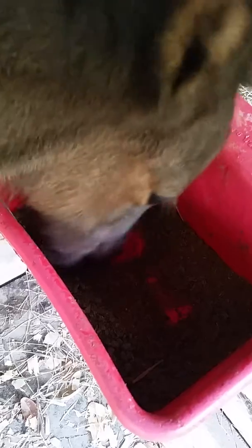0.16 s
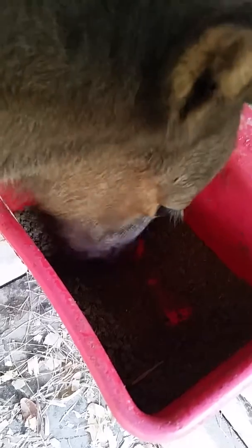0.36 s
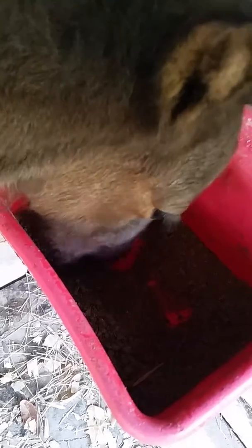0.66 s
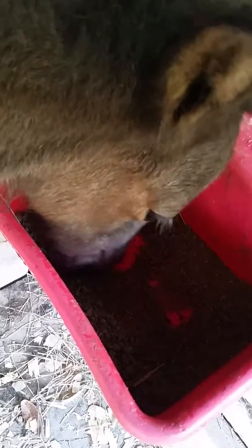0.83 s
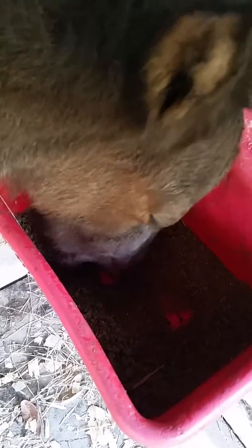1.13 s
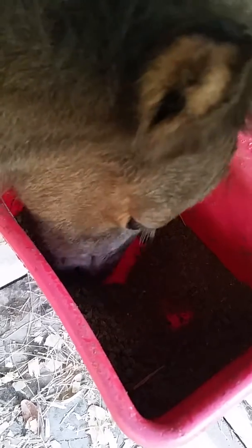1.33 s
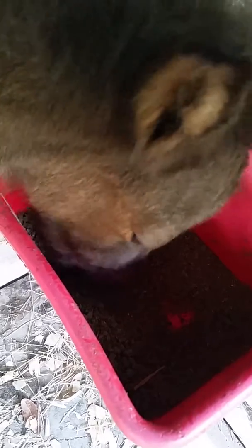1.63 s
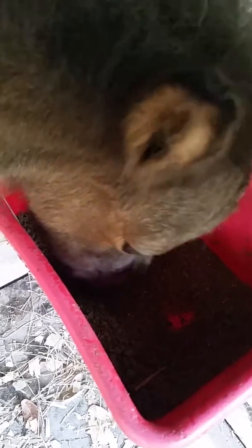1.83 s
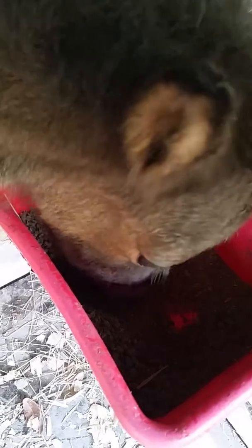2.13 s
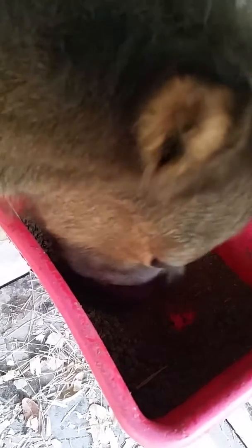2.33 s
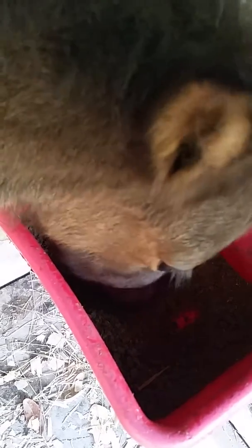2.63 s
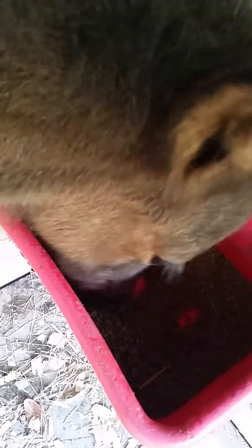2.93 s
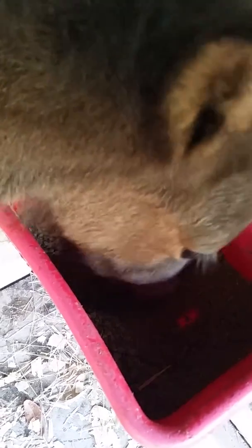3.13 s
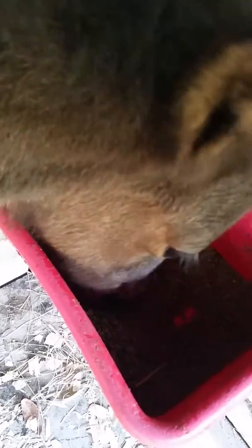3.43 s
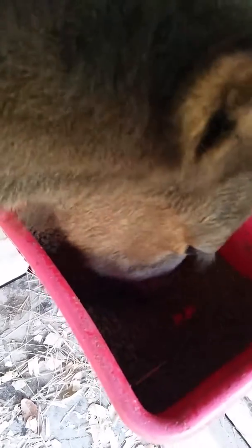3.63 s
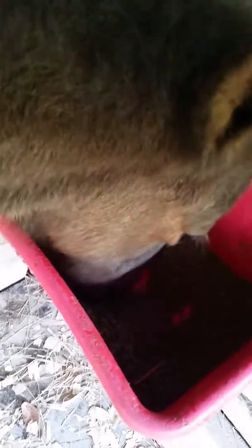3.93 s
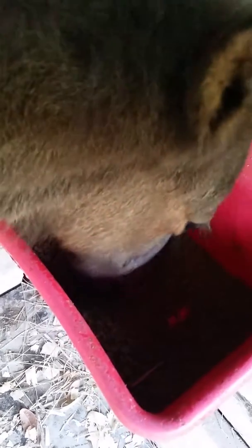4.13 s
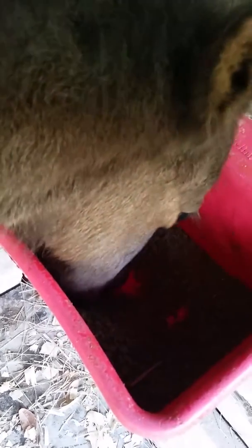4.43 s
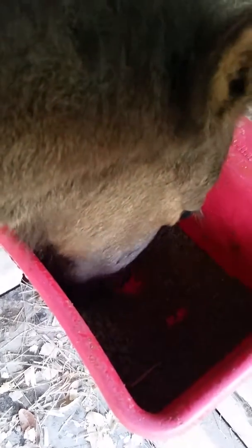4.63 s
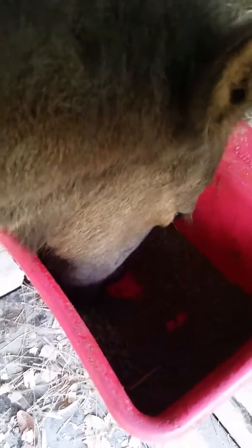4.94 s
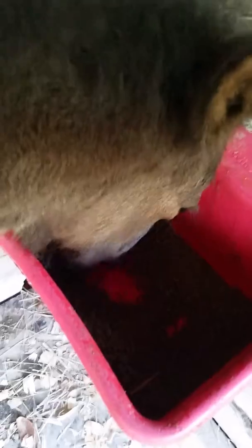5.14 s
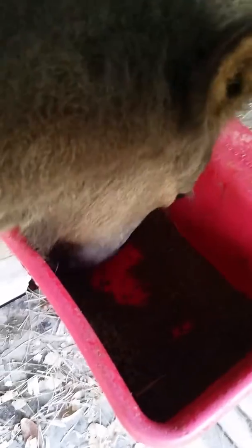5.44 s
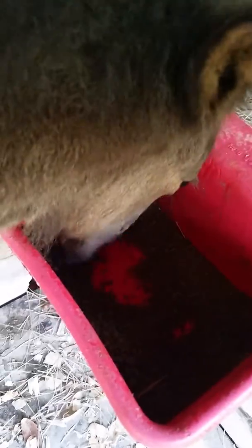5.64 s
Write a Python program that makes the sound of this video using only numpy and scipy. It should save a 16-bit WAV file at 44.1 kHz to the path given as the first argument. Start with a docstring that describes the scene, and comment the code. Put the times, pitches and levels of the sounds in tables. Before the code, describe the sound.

A close stereo microphone by a plastic feed tub catches a young horse eating. First come quiet dull crunches and tiny wet clicks, then fine, crisp swishes of dry meal with snapping grains, scraping and low thumps on the tub. Chewing continues throughout over soft outdoor rumble, slight hiss and distant gliding birds, and a strong short thud lands just before the end.

```python
"""A foal chews crushed feed with its muzzle in a plastic tub, heard close by in quiet outdoor air.
From the start, muffled crunches (random fractures through resonators) come in strokes about two a second,
under faint gliding whistles of far birds. From about 2 s the muzzle pushes into dry meal (pinging grains)
and bumps the tub (decaying wall modes); the wall then rumbles (shaped noise) to the end. The whistles are
clearest from 3 to 4 s; the hardest bump comes last."""
import sys
import numpy as np
from scipy import signal
from scipy.fft import rfft, irfft, next_fast_len
from scipy.io import wavfile

SR = 44100
rng = np.random.default_rng(int(sys.argv[2]) if len(sys.argv) > 2 else 0)


def output_pcm(signal):
    """Save a mono or channel-first signal as 16-bit PCM at the path in sys.argv[1].

    Samples are clipped to [-1, 1] before scaling.
    """
    pcm = np.clip(np.atleast_2d(signal).T, -1, 1) * 32767
    wavfile.write(sys.argv[1], SR, np.round(pcm).astype(np.int16))


N = 254891
TIME = np.arange(N) / SR
CUTOFF_HZ = 15850

# loudest feed breaking between the teeth:
# (time [s], level [dB], length [s], ring [Hz], crispness re ring [dB])
CRUNCHES = [(0.002, -59, 0.012, 842, -17), (0.287, -59, 0.0075, 454, -26), (0.325, -60, 0.0053, 480, -28),
            (0.356, -49.5, 0.023, 452, -23.5), (0.389, -43.5, 0.0015, 586, -2.5),
            (0.403, -51.5, 0.0042, 490, -7), (0.427, -48.5, .005, 520, -24),
            (0.439, -50.5, 0.0035, 800, -25), (0.468, -47.5, 0.0018, 565, -15),
            (0.491, -48, 0.0032, 477, -8.5), (0.509, -45, 0.0039, 452, -21.5),
            (0.527, -48, 0.003, 480, -9.5), (0.604, -48.5, 0.015, 499, -25),
            (0.634, -55.5, 0.0078, 443, -27), (0.758, -62.5, 0.014, 474, -11.5),
            (0.786, -58, 0.0043, 530, -9), (0.925, -59, 0.02, 455, -24), (0.996, -48, 0.0047, 514, -27),
            (1.009, -50.5, 0.0045, 546, -13), (1.053, -56.5, 0.0094, 450, -25),
            (1.147, -64, 0.0036, 460, -30), (1.179, -60, 0.0096, 477, -31),
            (1.414, -58.5, 0.0068, 526, -26), (1.472, -57, 0.0036, 480, -26),
            (1.499, -53, 0.0032, 546, -17), (1.51, -49.5, 0.0089, 532, -18), (1.535, -51, 0.0045, 507, -16),
            (1.583, -60, 0.0072, 540, -24), (1.645, -60.5, 0.011, 470, -26),
            (1.776, -52.5, 0.019, 528, -20), (1.886, -51.5, 0.0042, 495, -24),
            (1.898, -44, 0.0075, 557, -7), (2.006, -56.5, 0.0025, 580, -8), (2.376, -55.5, 0.011, 488, -6),
            (2.66, -49.5, 0.0038, 398, -13), (3.013, -53.5, 0.01, 474, -2.5), (3.039, -49, 0.007, 493, -15),
            (3.049, -44.5, 0.0042, 715, -19), (3.084, -44, 0.0026, 530, -20),
            (3.452, -53, 0.0038, 474, -22), (3.533, -53.5, 0.013, 450, -22), (3.575, -54.5, 0.022, 475, -9),
            (3.644, -50.5, 0.0023, 566, -9), (3.667, -43, 0.0049, 485, -18),
            (3.764, -54.5, 0.035, 413, -12), (3.915, -47.5, 0.013, 420, -26),
            (4.153, -56, 0.0082, 510, -21.5), (4.172, -51, 0.0034, 556, -10), (4.184, -56, 0.017, 500, -6),
            (4.276, -47.5, 0.002, 580, -12), (4.281, -56.5, 0.006, 590, 0), (4.33, -54, 0.011, 437, -10.5),
            (4.498, -60, 0.0063, 490, -15), (4.551, -55, 0.011, 465, -12), (4.597, -55.5, 0.01, 484, -9),
            (4.622, -55, 0.0052, 500, -8), (4.651, -54, 0.0065, 471, -5), (4.665, -56, 0.0083, 473, -4),
            (4.679, -46, 0.0059, 497, -25), (4.69, -43.5, 0.0021, 460, -11), (4.703, -56.5, 0.017, 467, -6),
            (4.789, -59, 0.0041, 393, -4), (4.919, -48.5, 0.0041, 486, -26),
            (4.936, -48.5, 0.0056, 414, -34), (4.957, -48, 0.0016, 477, -32),
            (4.992, -49, 0.0036, 530, -13.5), (5.001, -51, 0.0056, 460, -11),
            (5.097, -52, 0.0089, 590, -6.5), (5.111, -55, 0.005, 567, 1), (5.123, -41, 0.0049, 532, -7.5),
            (5.168, -36.5, 0.0023, 910, -35), (5.407, -53, 0.0053, 465, -30),
            (5.459, -50.5, 0.0076, 477, -18), (5.537, -47.5, 0.0033, 904, -2),
            (5.567, -48.5, 0.0077, 938, -3), (5.586, -54, 0.0031, 910, -16), (5.589, -48, 0.0019, 980, -11),
            (5.604, -57, 0.0029, 910, -4), (5.689, -48, 0.003, 560, -18)]
# hollow of mouth and tub before pitch shift, main ring first: (frequency [Hz], width [Hz], gain [dB])
HOLLOW = [(471.2, 36, 8.5), (541, 18, -5), (741, 71, -8)]
# hard sound of the break, before random scatter: (frequency [Hz], width [Hz], gain [dB])
CRISP = [(800, 16, 23.5), (970, 16, 11), (1231, 88, 1), (1600, 28, 9), (2120, 81, -6), (3340, 1400, 5)]
# wet films parting at lips and teeth: (time [s], peak [dB], pitch [Hz])
SMACKS = [(0.372, -62, 1920), (0.3885, -52, 3700), (0.39, -53, 2150), (0.482, -63.5, 3500),
          (0.597, -65, 3600), (0.4668, -65, 1310), (0.4938, -66, 1690), (0.5134, -65, 1600),
          (0.5627, -57, 1660), (0.617, -62, 3220), (1.008, -66, 1940), (1.436, -67, 1410),
          (1.505, -69, 1520), (1.535, -76, 1910), (1.884, -64, 3600), (1.9018, -55, 2460),
          (1.904, -59, 3300), (3.0497, -60, 1400), (3.084, -56, 1300), (3.17, -49.5, 1600),
          (3.647, -59, 1480), (3.6692, -53, 1200), (4.18, -52, 1300), (4.2172, -54, 1320),
          (4.6593, -45, 1320), (4.6915, -48, 1450), (5.06, -59, 1600), (5.106, -60, 2000),
          (5.1666, -53, 1760), (5.5396, -45.5, 1750)]
# strokes of the jaw: (middle [s], relative level [dB], half length [s])
CHEWS = [(0.447, -62, 0.16), (1.016, -59.5, 0.043), (1.601, -58, 0.1), (2.097, -57.5, 0.026),
         (2.492, -77, 0.2), (3.002, -59, 0.16), (3.68, -57, 0.23), (4.207, -60, 0.24), (4.67, -56.5, 0.14),
         (5.03, -58.5, 0.092), (5.513, -56, 0.17)]
JAW_IDLE_DB = -69.5  # grinding between strokes, same scale as CHEWS
# muzzle pushing through dry meal:
# (peak time [s], relative rustle [dB], rise [s], fall [s], relative scrape [dB], left minus right [dB])
PUSHES = [(0.003, -52.5, 0.012, 0.0066, -64, 2), (0.505, -76.5, 0.056, 0.099, -72.5, -1),
          (0.615, -74, 0.041, 0.041, -71, -3), (1.125, -72.5, 0.0081, 0.0092, -96, -13),
          (1.57, -75, 0.046, 0.086, -77, -4), (1.905, -76, 0.0095, 0.027, -59.5, -17),
          (2.08, -59, 0.015, 0.035, -67, -14), (2.15, -57, 0.026, 0.062, -65, -9.5),
          (2.253, -51.5, 0.05, 0.031, -59.5, -7.5), (2.458, -49, 0.02, 0.15, -60.5, -11),
          (2.557, -43.5, 0.071, 0.12, -55.5, -10), (2.739, -40.5, 0.056, 0.017, -51, -8.5),
          (2.781, -52.5, 0.013, 0.016, -60, -8), (2.907, -45, 0.039, 0.067, -52, -10),
          (3.091, -54.5, 0.062, 0.03, -64.5, -6.5), (3.256, -55.5, 0.084, 0.054, -63, -11),
          (3.35, -66.5, 0.012, 0.03, -70, -10), (3.514, -49, 0.031, 0.02, -57, -12),
          (3.6, -60, 0.035, 0.033, -72, -14), (3.671, -59, 0.023, 0.044, -70.5, -4),
          (3.751, -65.5, 0.013, 0.071, -63.5, -3.5), (4.01, -76, .005, 0.05, -66.5, -30),
          (4.085, -73, 0.068, 0.019, -76, -11), (4.183, -64, 0.013, 0.013, -81, -16),
          (4.248, -62.5, 0.043, 0.054, -65, -5.5), (4.692, -61.5, 0.037, 0.056, -68, -9),
          (5.065, -69.5, 0.025, 0.022, -61, -3), (5.108, -60.5, 0.0025, 0.066, -58, 3),
          (5.173, -49, 0.0059, 0.0068, -55.5, -3.5), (5.49, -61.5, 0.096, 0.54, -57, -13.5),
          (5.603, -52.5, 0.11, 0.019, -63, 1), (5.73, -61.5, 0.021, 0.044, -62, 2)]
SETTLE_DB, SETTLE_S = -27, 0.18  # meal trickling back, re its push
STILL_MEAL_DB, STILL_SCRAPE_DB = -93, -91.5  # lips stirring between pushes, same scale as PUSHES
DEEP_FROM_S, LEANING_SCRAPE_DB = 2.173, -78  # muzzle leans on the wall from here, with a steady scrape
# relative colour of the rustling meal, left ear: (frequency [Hz], density [dB per Hz])
MEAL_LEFT = [(2200, 2.5), (4300, -6), (5600, 0.5), (6500, 0), (8000, 7.5), (9400, 1.5), (11500, -3),
             (13500, -3.5), (16000, -0.5)]
# the same, right ear: (frequency [Hz], density [dB per Hz])
MEAL_RIGHT = [(2500, -14), (4400, -24.5), (5400, -19.5), (6200, -19), (7000, -13.5), (8200, -5),
              (9400, 1.5), (10300, -2.5), (11500, -6), (14000, -10.5), (16000, -7.5)]
# relative colour of the scrape on plastic: (frequency [Hz], density [dB per Hz])
SCRAPE = [(100, -6), (250, -2), (500, 5.5), (800, 0.5), (1150, 0), (1600, 2), (2000, -0.5), (2500, -2),
          (3300, -5.5), (4100, -20), (5000, -19)]
# loudest dry grains snapping: (time [s], peak before panning [dB], ping [Hz], left minus right [dB])
SNAPS = [(0.4948, -65, 5500, 2), (1.549, -68, 4600, 10), (1.6185, -59, 4800, 8), (1.839, -68, 4270, 10),
         (2.3845, -68, 9000, 13), (2.741, -40, 8900, -1), (2.905, -38, 8940, 2), (3.0856, -40, 8200, 14),
         (3.571, -47, 10200, -4), (3.6, -59.5, 11000, -8), (3.609, -55, 10700, 0), (3.645, -51.5, 9500, 2),
         (3.669, -46.5, 8500, 3), (4.241, -47, 9500, 2), (4.2476, -44, 9650, 4), (4.256, -52, 9300, -8),
         (4.653, -57, 8400, 3), (4.687, -50, 8400, 1), (4.693, -59, 8500, 7), (4.706, -48.5, 8850, -2),
         (4.726, -50, 9100, -10), (5.1055, -41.5, 8000, 9), (5.1288, -47, 8450, 6), (5.1638, -41, 9000, 17),
         (5.1678, -39.5, 7800, 0), (5.568, -50, 8850, 15), (5.575, -44, 10700, 14), (5.602, -63, 11600, 11),
         (5.612, -42, 10300, -4)]
GRAIN_CYCLES = 4  # typical decay of a stray grain's ping
# muzzle bumping the tub:
# (time [s], level [dB], contact cut-off [Hz], pitch factor, ring factor, left minus right [dB])
KNOCKS = [(2.07, -43, 600, 0.83, 0.87, -2), (2.269, -45, 157.5, 0.69, 1.7, 2),
          (2.7177, -23.5, 207, 0.81, 1.29, -1), (2.912, -38, 302, 1.27, 0.65, -1),
          (3.2211, -30.5, 338, 0.99, 1.72, -0.5), (3.503, -34, 167, 0.67, 0.61, -1),
          (3.526, -31.5, 150, 0.6, 0.74, -1.5), (4.0178, -32, 900, 1.07, 0.59, -12),
          (5.725, -12.5, 534, 1.005, 0.49, -2), (5.7336, -25.5, 387, 1.15, 1.17, -1.5)]
# tub wall modes before pitch and ring factors: (frequency [Hz], level [dB], t60 [s])
TUB = [(76.3, -22, 0.37), (113, -1.5, 0.11), (141.8, -10.5, 0.12), (229, -21, 0.14), (286, -5, 0.062),
       (400, -20, 0.098), (551, -13.5, 0.064), (736, -22.5, 0.049), (1180, -19.5, 0.055)]
# dull rasping scuffs: # (start [s], length [s], level [dB], cut-off [Hz], left minus right [dB])
SCUFFS = [(4.205, 0.15, -72.5, 1470, -10), (4.572, 0.082, -55, 990, -26), (4.59, 0.137, -55.5, 271, -11),
          (4.66, 0.081, -56, 1410, -20), (5.469, 0.099, -55, 295, -4)]
# relative colour of the muzzle rubbing the wall: (frequency [Hz], density [dB per Hz])
RUB_COLOUR = [(25, -12), (60, -13.5), (110, 2.5), (170, -8.5), (260, -7.5), (400, -26.5), (800, -54)]
# slurred whistles of a far bird, pitches before waver:
# (start [s], length [s], first [Hz], middle [Hz], last [Hz], relative level [dB])
WHISTLES = [(0.08, .15, 2210, 2130, 2080, -83), (0.66, .14, 2620, 2400, 2220, -86),
            (0.81, .12, 2680, 2520, 2330, -87), (1.61, .18, 2560, 2545, 2545, -86),
            (3.115, .085, 2440, 2455, 2520, -74), (3.335, .055, 2480, 2620, 2740, -69),
            (3.42, .075, 2650, 2550, 2455, -72), (3.475, .09, 2470, 2430, 2440, -65),
            (3.705, .06, 2450, 2600, 2830, -70), (3.785, .07, 2660, 2560, 2460, -75),
            (3.835, .095, 2470, 2415, 2435, -69), (3.97, .09, 2480, 2450, 2500, -80)]
# more distant birds: (time [s], level [dB])
CHORUS = [(0, -78), (0.14, -80), (0.3, -96), (0.62, -94), (0.8, -84), (1.1, -95.5), (1.7, -89), (2.0, -83),
          (3.15, -73), (3.4, -77), (3.85, -74), (4.15, -82.5), (4.55, -80.5), (4.85, -103)]
# relative colour of the outdoor rumble: (frequency [Hz], density [dB per Hz])
AIR = [(20, -14.5), (45, -3), (70, 3), (120, 2.5), (200, -4.5), (330, -11), (500, -13.5), (850, -24),
       (1050, -28), (1500, -29.5), (2300, -37), (3500, -43.5), (6000, -48), (16000, -47)]
# relative colour of the microphone hiss: (frequency [Hz], density [dB per Hz])
HISS = [(5500, -70), (7200, 0), (7750, -2.5), (8250, 22.5), (8700, -0.5), (9300, -55), (12000, -43),
        (15500, -0.5)]
# likeness of the two ears: (frequency [Hz], correlation [-1 to 1])
LIKENESS = [(30, 0.78), (120, 0.86), (300, 0.61), (640, 0), (1400, 0), (16000, 0.29)]


def from_db(db):
    """Decibels to gain."""
    return 10 ** (np.asarray(db) / 20)


def to_db(power):
    """Power to decibels."""
    return 10 * np.log10(power + 1e-20)


def rms_one(x):
    """Scale to unit power."""
    return x / np.sqrt(np.mean(x ** 2) + 1e-20)


def at_hz(points, hz):
    """Read a spectrum on a log-frequency axis."""
    f, value = np.transpose(points)
    return np.interp(np.log(hz + 1), np.log(f), value)


def fft_axis():
    """FFT size for the whole scene and its bin frequencies in Hz."""
    size = next_fast_len(N)
    return size, np.arange(size // 2 + 1) * SR / size


def drift(rate_hz):
    """Slow random curve of rms 1, with rate_hz knots a second."""
    knots = rng.standard_normal(4096)
    return rms_one(np.interp(TIME * rate_hz, np.arange(len(knots)), knots))


def panned(x, pan_db):
    """Share a sound between left and right; their mean gain stays 1."""
    left = from_db(pan_db)
    return x * np.reshape([2 * left / (1 + left), 2 / (1 + left)], (2, -1))


def ears(pair, width):
    """The first signal reaches both ears; a share of the second sets them apart."""
    return pair[0] + width * pair[1] * np.array([[1], [-1]])


def add(out, s, sound):
    """Mix a sound in at time s."""
    i = max(round(s * SR), 0)
    out[..., i:i + sound.shape[-1]] += sound[..., :max(N - i, 0)]


def butter(x, hz, kind, order=2):
    """Causal low- or high-pass."""
    sos = signal.butter(order, np.clip(hz, 10, .45 * SR), kind, fs=SR, output="sos")
    return signal.sosfilt(sos, x)


def resonate(x, modes, shift=1):
    """Parallel two-pole resonances, each of unit peak gain before its dB."""
    out = 0
    for hz, width_hz, db in modes:
        r = np.exp(-np.pi * abs(width_hz) / SR)
        zeros = [(1 - r * r) / 2, 0, (r * r - 1) / 2]
        poles = [1, -2 * r * np.cos(2 * np.pi * hz * shift / SR), r * r]
        out = out + from_db(db) * signal.lfilter(zeros, poles, x)
    return out


def coloured(pair, spectrum):
    """Shape two unrelated signals into stereo with LIKENESS between the ears; mid has rms 1."""
    size, hz = fft_axis()
    mid, side = rfft(pair, size) * from_db(at_hz(spectrum, hz))
    alike = np.clip(at_hz(LIKENESS, hz), -1, 1)
    mid, side = irfft([mid * np.sqrt(1 + alike), side * np.sqrt(1 - alike)], size)[:, :N]
    return np.array([mid + side, mid - side]) / np.std(mid)


def grains(per_s, spread_db, size):
    """Two unrelated trains of random clicks, many small and a few large."""
    draw = rng.uniform(-1, 1, (2, size)) * SR / per_s
    born = np.abs(draw) < 1
    clicks = np.full((2, size), 1e-18)
    height = np.minimum(-np.log(np.abs(draw[born])), 4)
    clicks[born] = np.sign(draw[born]) * from_db(spread_db * height)
    return clicks


def flicker(pair, depth_db, rate_hz, count=12):
    """Grains of different sizes come and go, so each band swells on its own; rms 1."""
    size, hz = fft_axis()
    place = np.interp(hz, [0, CUTOFF_HZ], [0, 1]) ** 0.538 * (count - 1)
    spectrum = rfft(pair, size)
    out = 0
    for k in range(count):
        band = irfft(spectrum * np.maximum(1 - abs(place - k), 0), size)[:, :N]
        out = out + band * from_db(depth_db * drift(rate_hz))
    return np.array([rms_one(x) for x in out])


def pinging(clicks, width_hz=340, patchy_db=3.3, count=28):
    """Each particle pings briefly at the pitch of its size, and the sizes come and go; rms 1."""
    dealt = rng.integers(0, count, N)
    out = 0
    for k, hz in enumerate(np.linspace(3600, CUTOFF_HZ, count)):
        pings = resonate(clicks * (dealt == k) + 1e-18, [(hz, width_hz, 0)])
        out = out + pings * from_db(patchy_db * drift(70))
    return rms_one(out)


def jaw_effort():
    """Relative grinding level in dB: each stroke swells and eases like a bell curve."""
    power = from_db(JAW_IDLE_DB) ** 2
    for s, db, half_s in CHEWS:
        power = power + from_db(db) ** 2 * np.exp(-2 * ((TIME - s) / half_s) ** 2)
    return to_db(power)


def crunches(low_hz=290, dull=0.76, swell=1.0, scatter=0.063, first_break=0.43):
    """Each bite is a moist run of small fractures; the hollow rings at the pitch of the mouth's opening."""
    out, t = np.zeros((2, N)), TIME[:SR // 6]
    for s, level_db, length_s, ring_hz, bright_db in CRUNCHES:
        # pressure swells and lets go
        breaks = grains(1800, 4.4, size=len(t)) * np.exp(-(t / length_s / swell - .6) ** 2)
        # the shorter the bite, the more it is one sharp break
        sharpness = first_break * (0.0065 / abs(length_s))
        breaks[:, 0] += sharpness * np.sqrt(np.sum(breaks ** 2, axis=1))
        damping = np.exp(-(t / (3.0 * length_s + 0.0057)) ** 2)  # soft lips
        ring = resonate(breaks, HOLLOW, (ring_hz / HOLLOW[0][0]) ** 0.936)
        ring = butter(butter(ring, low_hz, "high"), dull * ring_hz, "low") * damping
        # every mouthful cracks at pitches of its own
        own = [(hz * np.exp(scatter * rng.normal()), width_hz, db + 2 * rng.normal())
               for hz, width_hz, db in CRISP]
        crack = butter(resonate(breaks, own), 710, "high")
        crack = butter(crack, 1740, "low", order=4) * damping
        # level and length set the energy, however the fractures fall
        energy = abs(length_s) * SR
        ring, crack = (v * np.sqrt(energy / np.sum(v ** 2, axis=1, keepdims=True)) for v in (ring, crack))
        bite = ears(ring, 0.12) + from_db(bright_db) * ears(crack, 0.59)
        add(out, s, from_db(level_db) * bite)
    return out


def smacks(cycles=4.5, tear_s=0.0014, tear_db=-16.0):
    """A wet film bursts in one sharp click, tears a moment longer and rings for a few cycles."""
    out, t = np.zeros((2, N)), TIME[:SR // 40]
    for s, peak_db, hz in SMACKS:
        burst = grains(3000, 1.5, size=len(t)) * np.exp(-t / tear_s) * from_db(tear_db)
        burst[0, 0] += 1
        tick = butter(resonate(burst, [(hz, hz / cycles, 0)]), 1.4 * hz, "low", order=4)
        tick = ears(tick, 0.8)
        add(out, s, tick / np.abs(tick.mean(0)).max() * from_db(peak_db))
    return out


def crackle(effort_db, gain_db=-24.5, follows=0.8, tilt_db=-12.0, low_hz=1100, high_hz=4200, count=9):
    """Husk cracks in sparse sharp ticks, more often while the jaw presses; the lips muffle the top."""
    press = from_db(follows * (effort_db - effort_db.max()))
    ticks = 0
    for hz in np.geomspace(low_hz, high_hz, count):
        cracks = grains(16, 2.2, size=N) * (rng.random(N) < press) + 1e-18
        mode = (hz, hz / 7, tilt_db * np.log2(hz / low_hz))
        ticks = ticks + resonate(cracks, [mode]) / np.sqrt(hz)
    muffled = ears(butter(ticks, high_hz, "low", order=4), 1.0)
    return rms_one(muffled * press) * from_db(effort_db.max() + gain_db)


def grinding(effort_db, gain_db=-2.5, lumpy_db=3.0, shape_db=3.5, reach=0.14, count=3):
    """Molars mill clumps of small fractures, muffled by the cheeks; the hollow's pitch shifts with the jaw."""
    milled = 0
    for shift in np.exp(np.linspace(-reach, reach, count)):
        fractures = grains(1200, 2.2, size=N)
        milled = milled + resonate(fractures, HOLLOW, shift) * from_db(shape_db * np.tanh(drift(14)))
    milled = butter(milled * from_db(lumpy_db * drift(45)), 340, "high")
    milled = butter(milled, 780, "low")
    return from_db(effort_db + gain_db) * rms_one(ears(milled, 0.11))


def wet_pops(effort_db, peak_db=-50.5, follows=0.59, slope_db=26.5, cycles=4.5,
             low_hz=430, high_hz=2200, count=170):
    """Saliva films part in tiny pitched pops, louder while the jaw grinds and weaker the higher they are."""
    out, t = np.zeros((2, N)), TIME[:SR // 20]
    level_db = peak_db + follows * (effort_db - effort_db.max())
    for when, height, strength, side in rng.random((count, 4)):
        hz = low_hz * (high_hz / low_hz) ** height
        age = t * hz / cycles * 2
        pop = age * np.exp(1 - age) * np.sin(2 * np.pi * hz * t * (1 + 2 * t))  # pitch glides up
        db = level_db[int(when * N)] + 10 * (strength - .5) - slope_db * np.log2(hz / low_hz)
        add(out, when * N / SR, panned(pop, 10 * (side - .5)) * from_db(db))
    return out


def leaning():
    """0 to 1: how firmly the muzzle rests against the tub's wall."""
    return np.clip((TIME - DEEP_FROM_S) / 0.05, 0, 1)


def muzzle_motion(roundness=0.96):
    """Rustle, scrape and side in dB: each push builds up, dies away and leaves the meal settling."""
    meal, side = from_db(STILL_MEAL_DB) ** 2, 0
    scrape = from_db(STILL_SCRAPE_DB) ** 2 + leaning() * from_db(LEANING_SCRAPE_DB) ** 2
    for s, meal_db, rise_s, fall_s, scrape_db, pan_db in PUSHES:
        age_s = TIME - s
        steepness = np.abs(age_s / np.where(age_s < 0, rise_s, fall_s)) ** roundness
        push = np.exp(-2 * np.minimum(steepness, 20))
        push += (age_s > 0) * from_db(SETTLE_DB) ** 2 * np.exp(-2 * np.abs(age_s) / SETTLE_S)
        power = from_db(meal_db) ** 2 * push
        meal = meal + power
        scrape = scrape + from_db(scrape_db) ** 2 * push
        side = side + pan_db * power
    return to_db(meal), to_db(scrape), side / meal


def rustle(meal_db, scrape_db, pan_db, left_db=3.5, right_db=1.0, scrape_gain_db=-4.5,
           clump_db=1.3, grain_db=0.5):
    """Dry particles slide over each other; a harder push moves more of them and scrapes the plastic."""
    per_s = np.clip(6000 * from_db(0.37 * (meal_db + 51.5)), 2000, 12000)
    clumps = from_db(clump_db * drift(65))
    sliding = pinging(grains(per_s, grain_db, size=N) / np.sqrt(per_s) * clumps)
    size, hz = fft_axis()
    meal = []
    for x, colour in zip(sliding, (MEAL_LEFT, MEAL_RIGHT)):
        shaped = irfft(rfft(x, size) * from_db(at_hz(colour, hz)), size)[:N]
        meal.append(rms_one(shaped))
    meal = panned(np.array(meal), pan_db) * from_db(meal_db + np.array([[left_db], [right_db]]))
    scrape = flicker(grains(6000, 2.9, size=N), depth_db=2.5, rate_hz=60)
    return meal + coloured(scrape, SCRAPE) * from_db(scrape_db + scrape_gain_db)


def crumbs(scrape_db, pan_db, gain_db=-10.5, per_s=45, cycles=7.9, low_hz=1400, high_hz=4200,
           tilt_db=-7.5, count=10):
    """Coarse crumbs dragged along the bottom tick, each size at its own pitch."""
    ticks = 0
    for hz in np.geomspace(low_hz, high_hz, count):
        mode = (hz, hz / cycles, tilt_db * np.log2(hz / low_hz))
        ticks = ticks + resonate(grains(per_s, 3.0, size=N), [mode]) / np.sqrt(hz)
    return panned(rms_one(ears(ticks, 1.0)), 0.14 * pan_db) * from_db(scrape_db + gain_db)


def snaps(decay_s=0.0012, low_share=0.6, high_share=1.3, ping_width_hz=450, ping_db=14.0):
    """A brittle grain splits with a tiny spray of clicks and pings at a pitch of its own."""
    out, t = np.zeros((2, N)), TIME[:SR // 40]
    for s, peak_db, ping_hz, pan_db in SNAPS:
        spray = grains(20000, 0.97, size=len(t)) * np.exp(-t / decay_s)
        spray = spray + resonate(spray, [(ping_hz, ping_width_hz, ping_db)])
        spray = butter(spray, low_share * ping_hz, "high", order=3)
        spray = butter(spray, high_share * ping_hz, "low")
        add(out, s, panned(spray / np.abs(spray.mean(0)).max(), pan_db) * from_db(peak_db))
    return out


def stray_grains(meal_db, pan_db, above_db=-1.0, ceiling_db=-58.0, low_hz=7500, high_hz=12500, count=260):
    """Loose grains flick against the plastic; each pings at the pitch of its size."""
    out, t = np.zeros((2, N)), TIME[:SR // 100]
    for when, height, hardness, strength, side in rng.random((count, 5)):
        at = int(when * N)
        hz = low_hz * (high_hz / low_hz) ** height
        cycles = GRAIN_CYCLES * 10 ** (hardness - .5)
        ping = np.sin(2 * np.pi * hz * t) * np.exp(-t * hz / cycles)
        db = min(meal_db[at] + above_db, ceiling_db) + 16 * (strength - .5)
        add(out, at / SR, panned(ping, pan_db[at] + 12 * (side - .5)) * from_db(db))
    return out


def knocks(lag_s=0.00029, leak_hz=48):
    """A soft blow bends the loaded wall; its modes die fast, and the right ear hears them first."""
    out, t = np.zeros((2, N)), TIME[:SR // 3]
    age_s = np.maximum(t - np.array([[lag_s], [0]]), 0)
    for s, level_db, contact_hz, pitch, ring, pan_db in KNOCKS:
        wall = 0
        for hz, db, t60_s in TUB:
            # the slow swing of the whole tub opposes the quick flexing of the struck wall
            gain = np.sign(170 - hz) * from_db(db - 60 * age_s / (t60_s * ring))
            wall = wall + gain * np.sin(2 * np.pi * hz * pitch * age_s)
        add(out, s, panned(butter(wall, contact_hz, "low", order=1), pan_db) * from_db(level_db))
    return butter(out + 1e-18, leak_hz, "high")  # deep bass below leak_hz is taken out of the knocks


def scuffs(slips_per_s=900, low_hz=130):
    """A dull scuff rasps in small uneven jerks, mostly in the right ear."""
    out = np.zeros((2, N))
    for s, length_s, level_db, top_hz, pan_db in SCUFFS:
        size = int(abs(length_s) * SR)
        slips = grains(slips_per_s, 0.93, size=size)[0] * np.sqrt(np.hanning(size))
        slips = butter(np.pad(slips, (0, SR // 50)), top_hz / 2, "low", order=1)
        slips = butter(slips, 0.92 * top_hz, "low", order=3)
        slips = butter(slips, low_hz, "high", order=1)
        add(out, s, panned(rms_one(slips), pan_db) * from_db(level_db))
    return out


def rubbing(meal_db, scrape_db, gain_db=-53.5, follows_meal=0.091, follows_scrape=0.27, lumpy_db=3.0):
    """The leaning muzzle keeps the wall rumbling, more so the harder it pushes and scrapes."""
    level_db = gain_db + follows_meal * (meal_db - meal_db.max())
    level_db = level_db + follows_scrape * (scrape_db - scrape_db.max()) + lumpy_db * drift(24)
    return leaning() * from_db(level_db) * coloured(rng.standard_normal((2, N)), RUB_COLOUR)


def bird(waver=0.006, echo_s=0.035, echo_db=-2.0, flutter_db=2.6):
    """Gliding whistles, made to flutter and blurred by scattered echoes on their long way."""
    song, unsteady = np.zeros(N), 1 + waver * drift(150)
    for s, length_s, first_hz, middle_hz, last_hz, level_db in WHISTLES:
        along = np.clip((TIME - s) / length_s, 0, 1)
        on = (along > 0) & (along < 1)
        hz = np.interp(along[on], [0, .5, 1], [first_hz, middle_hz, last_hz]) * unsteady[on]
        tone = np.sin(2 * np.pi * np.cumsum(hz) / SR)
        song[on] += from_db(level_db) * np.sqrt(np.sin(np.pi * along[on])) * tone
    song = song * from_db(flutter_db * drift(55))
    paths = grains(480, 1.0, size=SR // 4) * np.exp(-TIME[:SR // 4] / echo_s)
    paths /= np.sqrt(np.sum(paths ** 2, axis=1, keepdims=True))
    echoes = signal.fftconvolve(song[None], paths, axes=1)[:, :N]
    return (song + from_db(echo_db) * echoes) / np.hypot(1, from_db(echo_db))


def chorus(centre_hz=2350, width_hz=600, flutter_db=2.5):
    """Farther birds overlap and smear into a diffuse shimmer of band noise, different at each ear."""
    band = [(centre_hz, width_hz, 0)]
    shimmer = resonate(resonate(rng.standard_normal((2, N)), band), band)
    shimmer = shimmer * from_db(flutter_db * drift(25))
    return rms_one(shimmer) * from_db(np.interp(TIME, *np.transpose(CHORUS)))


def background(air_db=-61.0, hiss_db=-75.5):
    """Quiet outdoor air and the microphone's own narrow hiss, both shaped noise."""
    air = from_db(air_db) * coloured(rng.standard_normal((2, N)), AIR)
    hiss = from_db(hiss_db) * panned(coloured(rng.standard_normal((2, N)), HISS), 2.6)
    return air + hiss


def scene():
    """Mouth, meal and tub in the open air."""
    effort_db = jaw_effort()
    meal_db, scrape_db, pan_db = muzzle_motion()
    mouth = crunches() + smacks() + crackle(effort_db) + grinding(effort_db) + wet_pops(effort_db)
    meal = rustle(meal_db, scrape_db, pan_db) + crumbs(scrape_db, pan_db)
    meal = meal + snaps() + stray_grains(meal_db, pan_db)
    tub = knocks() + scuffs() + rubbing(meal_db, scrape_db)
    return mouth + meal + tub + bird() + chorus() + background()


def record(dry):
    """Cut the top steeply above CUTOFF_HZ."""
    return signal.sosfilt(signal.ellip(12, .1, 80, CUTOFF_HZ, fs=SR, output="sos"), dry)


dry = scene()
out = record(dry)
output_pcm(out)
```